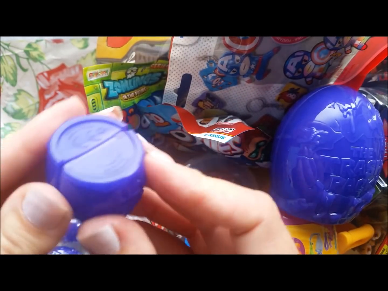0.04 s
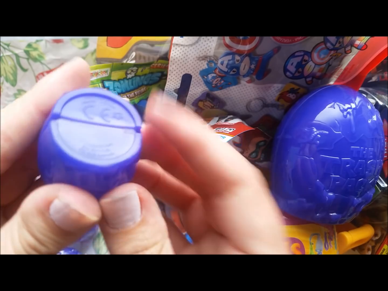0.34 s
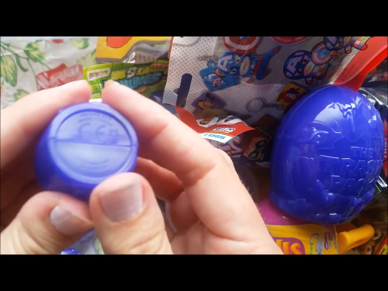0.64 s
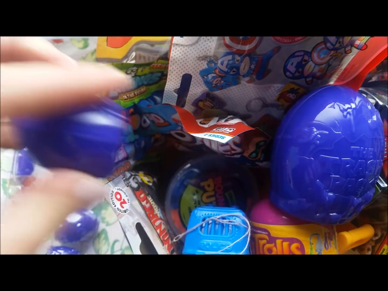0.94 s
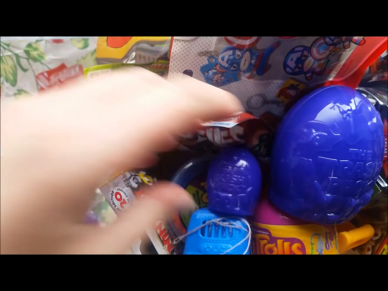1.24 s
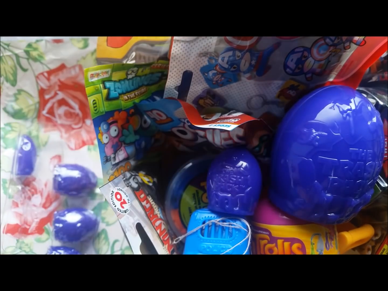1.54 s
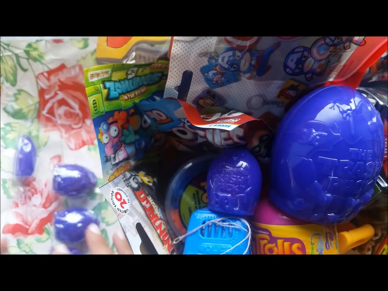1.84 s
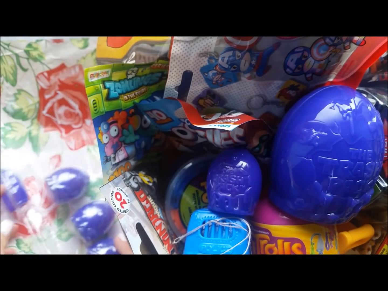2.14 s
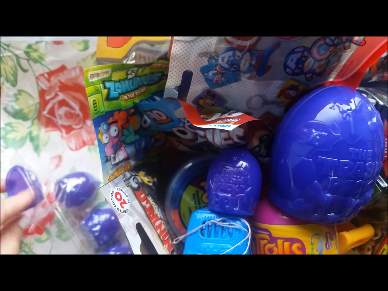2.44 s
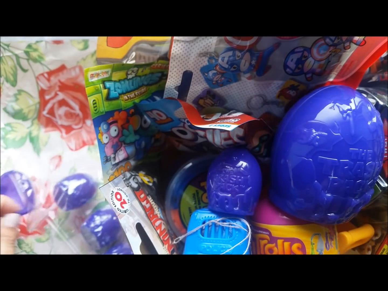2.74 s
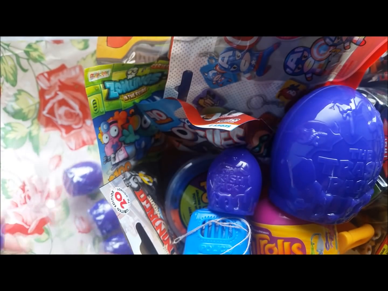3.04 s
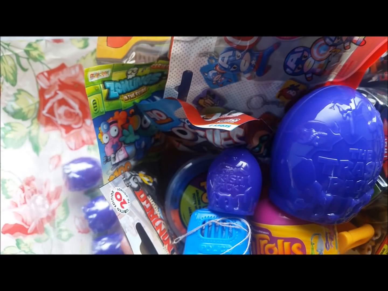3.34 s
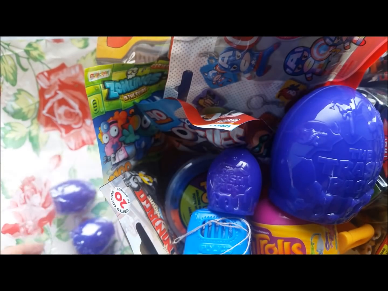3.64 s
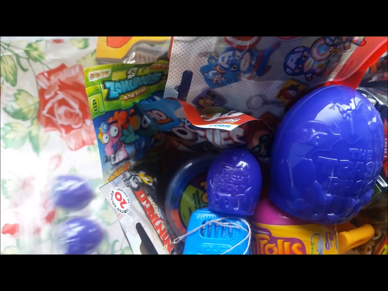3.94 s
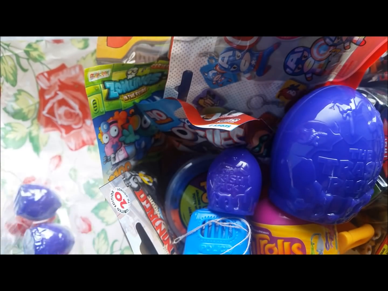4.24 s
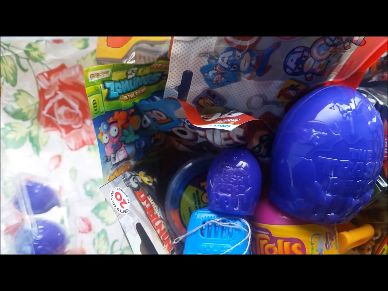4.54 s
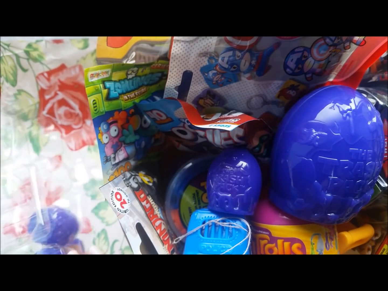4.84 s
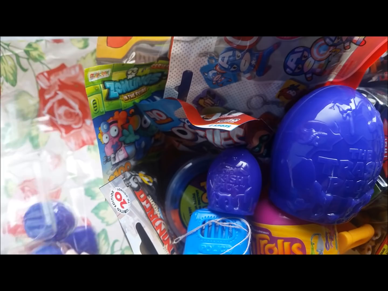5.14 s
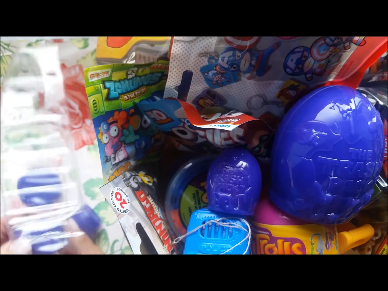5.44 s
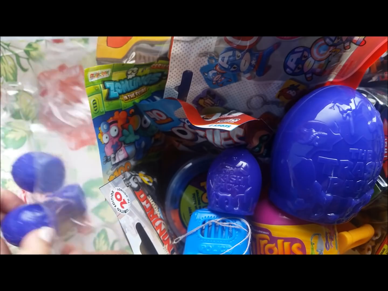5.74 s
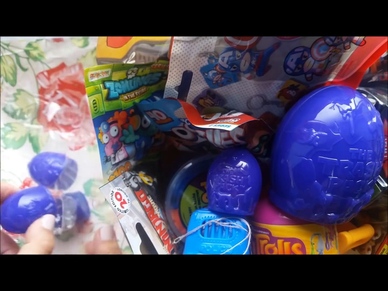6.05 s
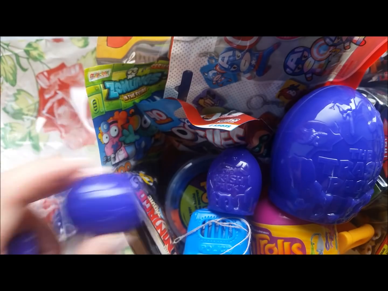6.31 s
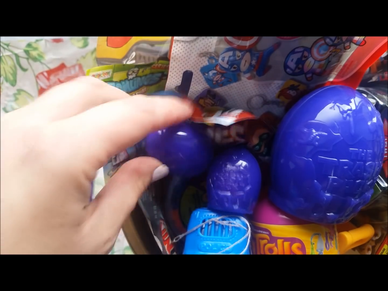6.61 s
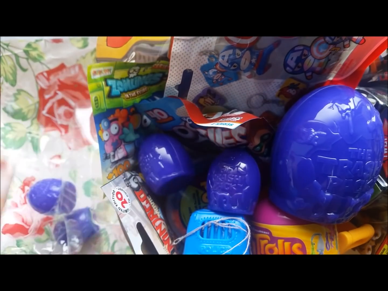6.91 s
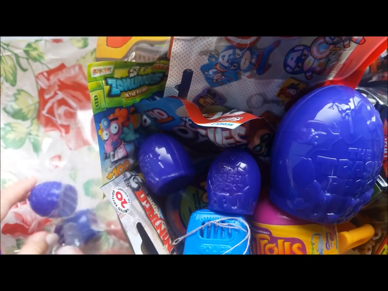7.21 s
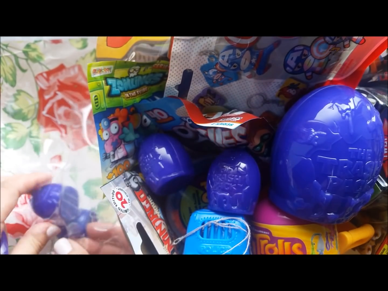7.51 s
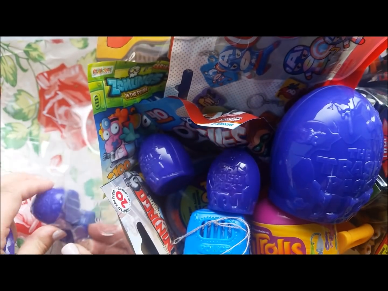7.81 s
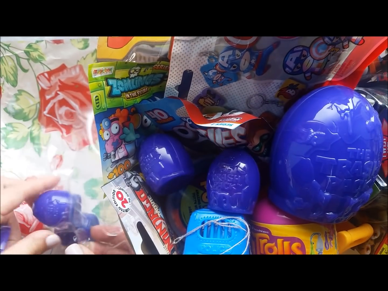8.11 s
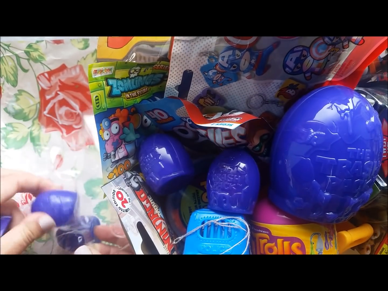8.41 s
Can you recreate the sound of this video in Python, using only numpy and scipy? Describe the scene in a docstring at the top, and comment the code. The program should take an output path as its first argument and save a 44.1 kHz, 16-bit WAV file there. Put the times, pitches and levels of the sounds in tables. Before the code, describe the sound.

In a small live room with a faint low hum, hard plastic toy capsules are handled near the microphone, toward the left. A few clicks and a quick clatter come first, followed by sliding and a loud hollow knock. Then a plastic bag crackles with dry, bright ticks and brief rustles, mixed with small finger squeaks, scrapes and more sharp knocks of the capsules on each other and the table.

```python
"""A low hum fills a small live room. Close to a stereo microphone, mostly on its left, fingers rub a
small plastic capsule and snap it shut; each impact rings the damped modes of the hollow shell.
From 2 s it slides by stick-slip friction and drops among toys, loudest near 2.9 s, and the table thuds.
From about 4 s the hands fish the next one out of a crinkly bag: creases of the film buckle with snaps
and crackles while the shells go on knocking and sliding."""
import sys
import numpy as np
from scipy import signal
from scipy.fft import rfft, irfft, next_fast_len
from scipy.io import wavfile

SR = 44100
rng = np.random.default_rng(int(sys.argv[2]) if len(sys.argv) > 2 else 0)


def waveform_to_disk(signal):
    """Save audio, clipped to [-1, 1], as 16-bit WAV at the path in sys.argv[1]."""
    frames = np.transpose(np.atleast_2d(signal))
    scaled = np.clip(frames, -1, 1) * 32767
    samples = np.round(scaled).astype(np.int16)
    wavfile.write(sys.argv[1], SR, samples)


N = 373527
T = np.arange(N) / SR

# Room hum and hiss. Each row: frequency in Hz, relative level in dB.
HUM_SPECTRUM = [(35, -9), (85, -3), (99, 7), (118, -15), (141, 3), (170, -16), (197, -7.5), (300, -23.5),
                (680, -35.5), (980, -32), (2700, -52.5), (3600, -44.5), (5000, -66.5), (15000, -66)]
# The hum sinks after the loudest knocks and creeps back between them. Each row: time in seconds, dB.
HUM_COURSE = [(2.85, -41), (3.05, -55), (4.3, -47), (7.35, -46), (7.55, -55)]
# Thin plastic rustles under the fingers. Each row: start and length in seconds, level in dB.
FILM_STROKES = [(0.268, 0.019, -64), (2.692, 0.082, -45), (3.379, 0.14, -60.5), (4.327, 0.085, -50),
                (4.642, 0.034, -33.5), (6.001, 0.043, -35.5), (6.189, 0.071, -37), (6.393, 0.035, -42.5),
                (6.662, 0.058, -40), (7.163, 0.207, -54.5), (7.497, 0.066, -34), (8.182, 0.051, -45.5)]
# Crackle of the film. Each row: frequency in Hz, gain in dB.
FILM_SPECTRUM = [(200, -34.5), (900, 14.5), (2200, 13.5), (4500, 6.5), (11000, 3), (16000, -6.5)]
# Fingertip squeaks. Each row: start and length in seconds, level in dB, resonance in Hz.
FINGER_STROKES = [(0.268, 0.017, -52.5, 1550), (2.693, 0.064, -48, 7020), (4.767, 0.0073, -34.5, 1760),
                  (6.003, 0.15, -37, 787), (6.16, 0.1, -43, 778), (6.205, 0.03, -41, 6800),
                  (7.405, 0.026, -45, 2800)]
# Capsule impacts. Each row: start in seconds, level in dB, shell pitch in Hz, body in dB relative to
# the level, table thud in dB, shell ring in dB relative to the body.
IMPACTS = [(0.408, -30, 1120, -6, -72, -15), (0.487, -31.5, 1024, -6.5, -36, -0.5),
           (0.598, -26, 860, -10.5, -18, -10), (1.282, -23, 1100, -5, -60, 4),
           (1.309, -22.5, 1230, -8, -33.5, -2.5), (1.333, -27.5, 1210, -3, -41, 1.5),
           (1.357, -38, 1230, -1, -37, -5), (2.055, -32, 890, -5, -42.5, -5),
           (2.147, -32.5, 896, 0, -28, -4), (2.236, -29, 1770, -8.5, -32.5, 6.5),
           (2.35, -30.5, 1890, -9.5, -29.5, -5), (2.488, -28.5, 970, -6.5, -55, -4),
           (2.873, -9.5, 1644, -15.5, -27.5, 0), (4.439, -21.5, 2480, -9, -36.5, -12),
           (4.699, -16, 580, -9, -36.5, -9), (5.92, -24.5, 670, -2.5, -72, -11),
           (5.999, -15.5, 775, -4, -34, -10), (6.084, -23.5, 810, -7, -54, -3),
           (6.151, -15.5, 790, -14.5, -65, -1), (6.153, -26.5, 2150, -0.5, -74, -5),
           (6.708, -20, 1840, -14, -35, -6), (6.847, -15.5, 1210, -8.5, -39, -1),
           (7.39, -18.5, 2460, -4, -64, -2), (7.473, -10.5, 2200, -13, -35, -4)]
# Modes of a capsule. Each row: multiple of the shell pitch, level in dB, cycles to decay by 60 dB.
SHELL_MODES = [(0.45, -3, 73), (0.999, 12, 21), (1.2, -11, 24), (2.05, -11, 38)]
# Modes of the toy-laden table. Each row: frequency in Hz, level in dB, 60 dB decay time in seconds.
TABLE_MODES = [(107, -10.5, 0.053), (142.6, 2.5, 0.26), (194.7, -1.5, 0.28), (255.6, -5.5, 0.18),
               (488.7, -10, 0.17)]
# The hands are busy in the bag, shifting the capsules. Each row: start and length in seconds.
BAG_SPELLS = [(1.978, 0.84), (4.19, 4.06)]
# Capsules are pushed along the table. Each row: start and length in seconds, level in dB.
PUSH_STROKES = [(2.03, 0.24, -40), (3.65, 0.19, -57.5), (4.26, 0.42, -50.5), (4.68, 0.018, -35.5),
                (5.36, 0.061, -62), (5.64, 0.091, -49), (5.99, 0.11, -30.5), (6.15, 0.39, -45),
                (6.66, 0.23, -44.5), (7.14, 0.19, -47), (7.94, 0.29, -64.5)]
# Modes of sliding capsules. Each row: frequency in Hz, level in dB, 60 dB decay time in seconds.
SLIDE_MODES = [(512, 0.5, 0.091), (810.5, 9, 0.049), (962, 5.5, 0.015), (1920, 25, 0.0017)]
# Film creases snap. Each row: start in seconds, level in dB, body in dB relative to the level.
CREASE_SNAPS = [(2.019, -38.5, -11), (2.101, -31, -23), (2.11, -21, -22.5), (2.397, -20, -20.5),
                (2.677, -19.5, -18), (3.129, -30, -10.5), (3.161, -25.5, -27), (3.229, -19.5, -16.5),
                (3.817, -48, -10.5), (4.081, -47, -5), (4.165, -29, -22.5), (4.274, -28.5, -19),
                (4.277, -23, -30), (4.303, -21.5, -21.5), (4.497, -25.5, -52), (4.555, -17.5, -22.5),
                (4.589, -19.5, -23), (4.606, -16, -22), (4.629, -21.5, -25), (4.796, -24, -30),
                (4.842, -20.5, -19.5), (4.88, -26.5, -50.5), (4.913, -20, -29), (4.966, -29, -45),
                (5.001, -31, -7.5), (5.01, -29.5, -39), (5.026, -23, -33), (5.201, -27, -22),
                (5.342, -31.5, -24), (5.361, -33.5, -17), (5.576, -39.5, -12), (5.959, -29, -25),
                (6.474, -32, -11), (6.802, -32, -13), (7.611, -21.5, -24), (7.777, -28, -19),
                (7.873, -36, -15), (7.898, -30.5, -28), (7.943, -25.5, -16.5), (7.958, -23.5, -21.5),
                (7.997, -20.5, -19.5), (8.079, -36, -32), (8.151, -27, -27), (8.422, -33.5, -14),
                (8.457, -20, -25)]
# Decay of the room. Each row: frequency in Hz, reverberation time in seconds.
REVERB_TIMES = [(300, 0.46), (1600, 0.5), (4000, 0.52), (13000, 0.39)]
# The first capsule is held close, so it sounds drier. Each row: time in seconds, room gain in dB.
REVERB_SEND = [(0.9, -4), (1.2, 0)]
# Colour of the microphone. Each row: frequency in Hz, gain in dB.
MIC_RESPONSE = [(35, -16.5), (90, -7.5), (5600, 4.5), (7000, 8.5), (8800, 3.5), (10600, 7.5)]


def amp(db):
    """Amplitude ratio of a level in decibels."""
    return 10 ** (np.asarray(db) / 20)


def unit(x):
    """Normalisation to rms 1."""
    return x / np.sqrt(np.mean(x ** 2))


def unit_energy(x):
    """Normalisation to the energy of 10 ms at rms 1."""
    return unit(x) * np.sqrt(.01 * SR / x.shape[-1])


def curve(rows):
    """Linear interpolation of (seconds, value) rows."""
    return np.interp(T, *np.transpose(rows))


def at_hz(points, hz):
    """Interpolation of (Hz, value) points on a log-frequency axis."""
    f, value = np.transpose(points)
    return np.interp(np.log(hz + 1), np.log(f), value)


def colour(x, points):
    """Zero-phase filtering by a (Hz, dB) spectrum."""
    n = x.shape[-1]
    size = next_fast_len(n + 1024)
    gain = amp(at_hz(points, np.fft.rfftfreq(size, 1 / SR)))
    return irfft(rfft(x, size) * gain, size)[..., :n]


def fade(t60, t):
    """Exponential decay by 60 dB in t60 seconds."""
    return np.exp(-np.log(1000) * t / t60)


def ring(modes, t):
    """Impulse response of (Hz, dB, t60) modes: a sum of damped sines."""
    return sum(amp(db) * fade(t60, t) * np.sin(2 * np.pi * hz * t) for hz, db, t60 in modes)


def add(track, start, sound):
    """Superposition of a sound on both channels, from start in seconds."""
    i = max(int(start * SR), 0)
    track[:, i:i + sound.shape[-1]] += sound[..., :N - i]


def grains(per_s, spread_db):
    """A Poisson train of impulses, many small and a few large, at rms 1."""
    sizes = amp(spread_db * np.minimum(rng.exponential(size=N), 4))
    return unit((rng.random(N) < per_s / SR) * sizes * rng.choice([-1, 1], N))


def wander(per_s):
    """Random modulation with a spread near 1 and per_s new values a second."""
    return np.interp(T * per_s, np.arange(N // 100), 1.2 * rng.standard_normal(N // 100))


def stroke(start, length, attack_s, release_s):
    """Envelope of a hand movement: exponential attack, hold, exponential release."""
    return np.exp(np.minimum(T - start, 0) / attack_s - np.maximum(T - start - length, 0) / release_s)


def scatter(n):
    """Scattering by the clutter leaves the noise on the two sides only partly coherent."""
    shared, *own = rng.standard_normal((3, n))
    return shared + .7 * np.array(own)


def place(sound):
    """Travel time: sound reaches the right side later, by a lag that depends on its spot."""
    left, right = np.broadcast_to(sound, (2, sound.shape[-1]))
    lag = rng.integers(7, 15)
    return np.array([left, np.pad(right, (lag, 0))[:len(left)]])


def hum():
    """Low room resonances under faint hiss; long waves reach both sides nearly alike."""
    mid, side = colour(rng.standard_normal((2, N)), HUM_SPECTRUM)
    spread = colour(side, [(100, -11), (250, -6), (700, 0)]) / np.std(mid)
    return amp(curve(HUM_COURSE)) * (unit(mid) + np.array([spread, -spread]))


def rustles():
    """Buckling of tiny film facets gives bursts of noise, pitched by facet size."""
    crackle = 0
    for hz in (1000, 2300, 5300, 12000):
        flips = np.abs(grains(per_s=600, spread_db=3.5))
        bursts = signal.oaconvolve(flips, fade(.012, T[:SR // 50]))[:N]
        crackle += colour(bursts * scatter(N), [(hz / 3, -24), (hz, 0), (hz * 3, -24)])
    envelope = sum(amp(db) * stroke(start, length, attack_s=.023, release_s=.012)
                   for start, length, db in FILM_STROKES)
    return place(envelope * unit(colour(crackle, FILM_SPECTRUM)))


def finger_rubs():
    """Stick-slip friction of a fingertip excites one hollow resonance that drifts with the grip."""
    out, t = np.zeros(N), T[:SR // 20]
    drift, decay_cycles = .038, 11
    slips = grains(per_s=900, spread_db=3)
    phase_per_hz = 2 * np.pi * np.cumsum(1 + drift * wander(per_s=25)) / SR
    for start, length, db, hz in FINGER_STROKES:
        swell = signal.oaconvolve(slips, t * fade(decay_cycles / hz, t))[:N]
        squeak = unit(swell * np.sin(hz * phase_per_hz))
        out += amp(db) * stroke(start, length, attack_s=.008, release_s=.008) * squeak
    return place(out)


def crack(tone, rise_s, t60, rattle_db, rattle_t60):
    """Sudden buckling of plastic: a noise transient with a chattering tail and a (Hz, dB) tone."""
    t = T[:SR // 12]
    rise = 1 - np.exp(-(t / rise_s) ** 2)
    decay = fade(t60, t) + amp(rattle_db) * fade(rattle_t60, t)
    burst = unit_energy(scatter(len(t)) * rise * decay)
    return colour(np.pad(burst, ((0, 0), (0, len(t)))), tone)[:, :len(t)]


def knocks():
    """Impact excites free vibration: the contact cracks, the shell rings, the table thuds."""
    out, t = np.zeros((2, N)), T[:SR // 2]
    grip_damping = fade(.15, t)  # fingers and clutter absorb the ringing
    thud = unit_energy(ring(TABLE_MODES, t))
    for start, db, pitch_hz, body_db, thud_db, ring_db in IMPACTS:
        # the shell radiates best in the octave above its pitch, so the crack sounds hollow
        hollow = [(.2, -2), (.6, 4), (.95, 11.5), (1.3, 8.5)]
        top_db = -23 - .43 * body_db
        tone = [(ratio * pitch_hz, body_db + gain_db) for ratio, gain_db in hollow]
        tone += [(1.75 * pitch_hz, (body_db + top_db) / 2 + 5.5), (11000, top_db)]
        # harder blows chatter for longer
        contact = crack(tone, rise_s=.0015, t60=.068 * amp(db / 4), rattle_db=-38, rattle_t60=.086)
        # every capsule is gripped and struck at a different spot
        modes = [(pitch_hz * ratio, mode_db + 2 * rng.standard_normal(), cycles / (pitch_hz * ratio))
                 for ratio, mode_db, cycles in SHELL_MODES]
        shell = amp(db + body_db + ring_db) * unit_energy(ring(modes, t) * grip_damping)
        add(out, start - .001, amp(db + 3.5) * place(contact))
        add(out, start, place(shell + amp(thud_db + 3) * thud))
    return out


def slides():
    """Stick-slip friction moves the capsules in jerks, driving the modes of shells and table."""
    t = T[:SR // 3]
    jerk_db, drift, shift_db = 4.5, .07, -51.5
    slips = grains(per_s=800, spread_db=3) * amp(jerk_db * wander(per_s=35))
    rub = unit(signal.fftconvolve(slips, ring(SLIDE_MODES, t))[:N])
    # the resonances shift as the capsules roll and press on each other
    warped_samples = np.cumsum(1 + drift * wander(per_s=10))
    rub = np.interp(warped_samples, np.arange(N), rub, period=N)
    rumble = unit(signal.fftconvolve(slips, ring(TABLE_MODES, t))[:N])
    moves = PUSH_STROKES + [(start, length, shift_db) for start, length in BAG_SPELLS]
    power = sum((amp(db) * stroke(start, length, attack_s=.027, release_s=.033)) ** 2
                for start, length, db in moves)
    return place(np.sqrt(power) * (rub + amp(-8.5) * rumble))


def snaps():
    """Snap-through buckling: film creases flip with dry, bright ticks, each of its own colour."""
    out = np.zeros((2, N))
    for start, db, body_db in CREASE_SNAPS:
        top_db = -20.5 - .24 * body_db  # more body, less treble
        tone = [(200, body_db - 11.5), (900, body_db + 8), (1900, body_db + 12.5),
                (3500, (body_db + top_db) / 2 + 8), (11000, top_db)]
        tone = [(hz, tone_db + 2 * rng.standard_normal()) for hz, tone_db in tone]
        tick = crack(tone, rise_s=.0018, t60=.007, rattle_db=-21, rattle_t60=.065)
        add(out, start, amp(db + 4) * place(tick))
    return out


def room(x, build_s):
    """Reverberation: wall reflections build up and decay exponentially, the top treble first."""
    t = T[:int(.7 * SR)]
    hz = np.fft.rfftfreq(len(t), 1 / SR)
    noise = rfft(rng.standard_normal((2, len(t))))
    tail = 0
    for centre_hz, t60 in REVERB_TIMES:
        band = at_hz([(f, f == centre_hz) for f, _ in REVERB_TIMES], hz)
        tail += irfft(noise * band, len(t)) * fade(t60, t)
    response = unit(tail * np.minimum(t / build_s, 1)) / np.sqrt(len(t))
    send = colour(x, [(150, -8.5), (500, -2), (1150, -6), (14000, -1.5)])
    return signal.fftconvolve(send, response, axes=1)[:, :N]


def scene():
    """Direct sound, reverberation and hum superpose; the right side lies in acoustic shadow."""
    handling = rustles() + finger_rubs() + knocks() + slides()
    ticks = snaps()
    direct = handling + ticks
    left = colour(direct[0], [(150, 1), (600, 4), (14000, 3)])
    right = colour(direct[1], [(150, 0), (500, -4), (14000, -4)])
    right += colour(direct[0], [(1500, -40), (4000, -12), (12000, -4)])  # the top treble is more alike
    send = (handling + amp(-1) * ticks) * amp(curve(REVERB_SEND))
    walls = amp([[1.8], [-1.8]]) * room(send, build_s=.0058)
    return np.array([left, right]) + walls + hum()


def record(dry):
    """Transduction: the microphone colours the sound, clips at full scale and limits the bandwidth."""
    top_hz = 15900
    clipped = np.clip(colour(dry, MIC_RESPONSE), -1, 1)
    return signal.sosfilt(signal.ellip(10, .2, 70, top_hz, fs=SR, output="sos"), clipped)


dry = scene()
out = record(dry)
waveform_to_disk(out)
```